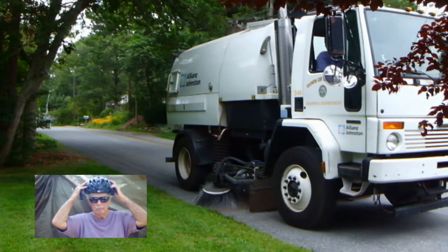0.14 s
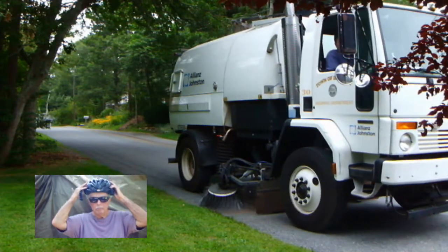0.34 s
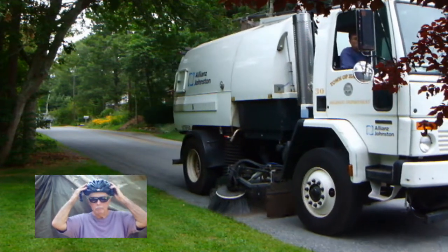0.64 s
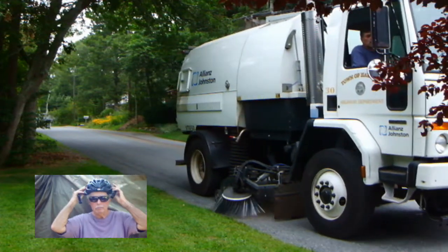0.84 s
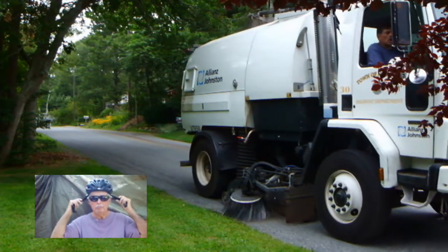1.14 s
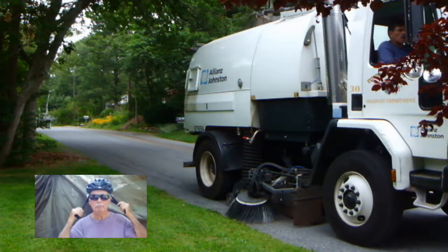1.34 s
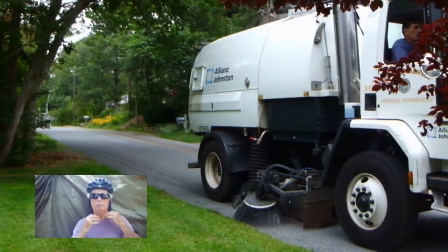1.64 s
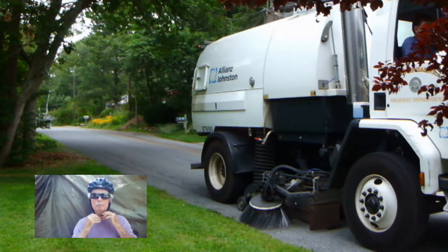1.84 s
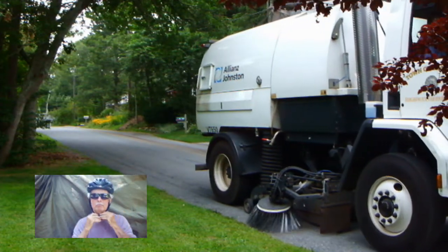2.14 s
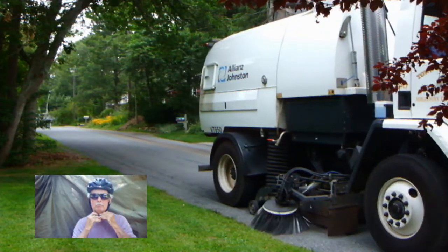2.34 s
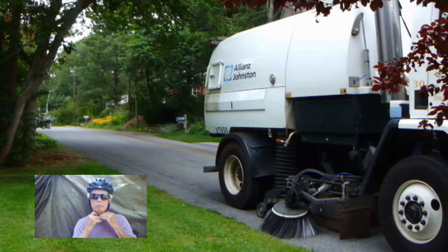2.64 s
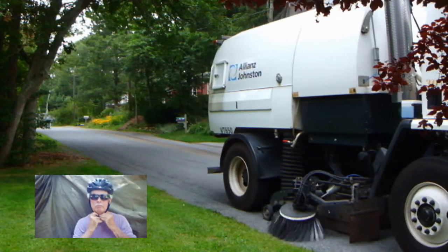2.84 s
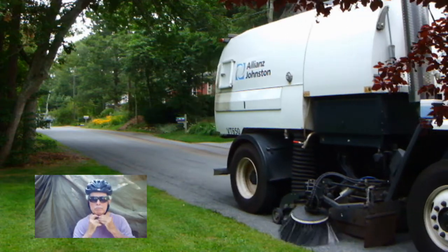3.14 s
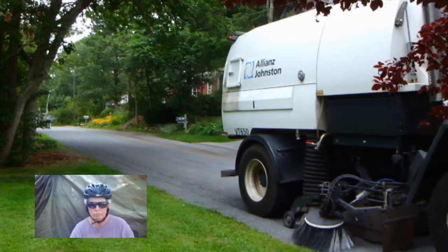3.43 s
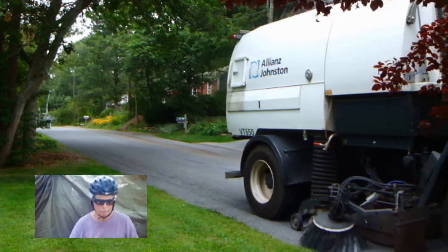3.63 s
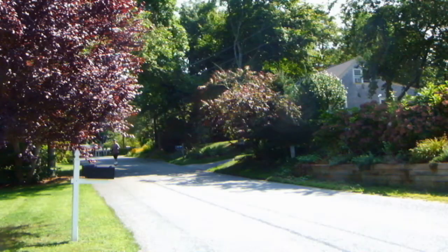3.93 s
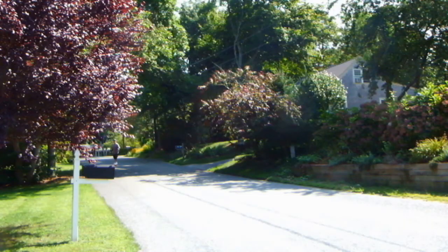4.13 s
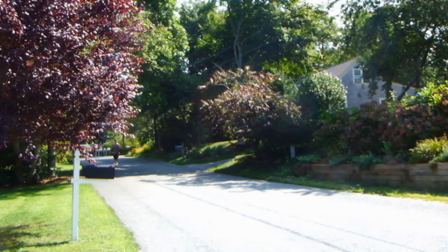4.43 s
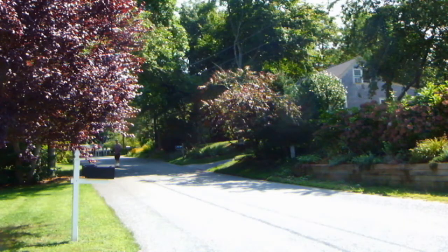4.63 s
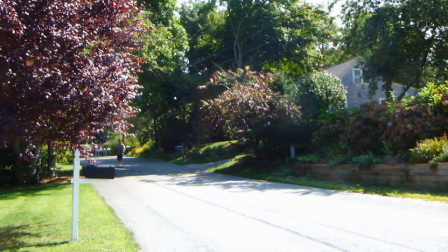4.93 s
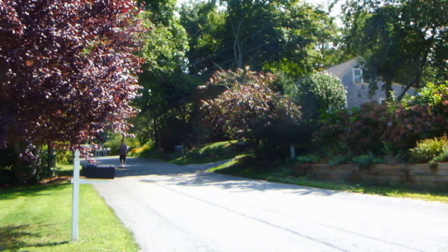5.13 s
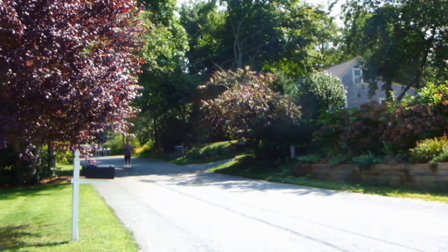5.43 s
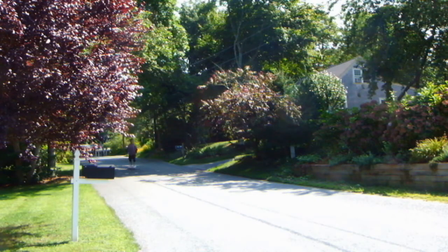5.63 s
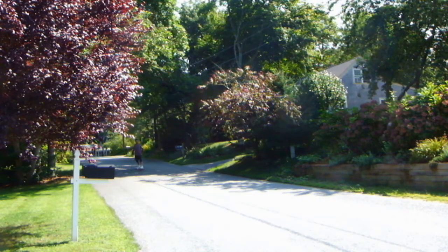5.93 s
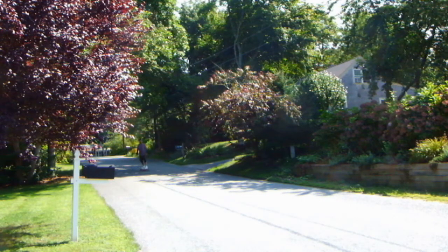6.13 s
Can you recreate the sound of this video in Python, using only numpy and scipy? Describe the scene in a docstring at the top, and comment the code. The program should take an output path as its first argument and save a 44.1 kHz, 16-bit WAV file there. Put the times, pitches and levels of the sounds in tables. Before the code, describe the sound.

Heard from the side of a residential road, a sweeping truck hums and roars steadily, its bristles hissing over the pavement. A few thin metal squeals come early, then one sharp, close buckle click. Suddenly the truck is gone, leaving soft outdoor air and a faint, low engine far away. A bird gives a short, high, buzzy call, and a bicycle rolls past with tyre hiss, freewheel ticking, small stone pops and a soft knock.

```python
"""Street sweeper, then a quiet road

A sweeper creeps along a tree-lined road: its diesel drones, the suction fan hums and roars, a wire
broom scrapes the asphalt and rubbing metal squeals. Close by, a plastic helmet buckle snaps shut.
A hard cut leads to the quiet road: a far engine throbs, a bird whistles thin and high, and a bicycle
coasts by, its freewheel ticking and grit popping under its tyres."""
import sys
import numpy as np
from scipy import signal
from scipy.fft import rfft, irfft
from scipy.io import wavfile
from scipy.ndimage import uniform_filter1d

SR = 44100
rng = np.random.default_rng(int(sys.argv[2]) if len(sys.argv) > 2 else 0)


def transcribe(u):
    """Save the signal u as a 16-bit wav file named by the first command-line argument.

    u: samples, shape (n,) or (channels, n), limited to [-1, 1]; the rate is SR.
    q: integer samples, one column per channel.
    """
    v = np.clip(np.atleast_2d(u).T, -1, 1)
    q = np.round(v * 32767).astype(np.int16)
    wavfile.write(sys.argv[1], SR, q)


N = 276491
T = np.arange(N) / SR

# the diesel speeds up a little: time_s, firing_hz
FIRING_RATE = [(0, 89.25), (.6, 90.44), (1.65, 92.46), (2.35, 96.16), (3.25, 96.3), (3.7, 97.64)]
# how alike left and right are near the truck: frequency_hz, correlation
TRUCK_LIKENESS = [(60, 0.97), (110, 0.98), (200, 0.97), (380, 0.96), (700, 0.93), (1290, 0.86),
                  (2380, 0.83), (4400, 0.35), (8120, 0.21), (15000, 0.17)]
# how alike left and right are on the quiet road: frequency_hz, correlation
ROAD_LIKENESS = [(60, 0.92), (130, 0.86), (290, 0.84), (640, 0.78), (1410, 0.69), (3100, 0.53),
                 (6820, 0.28), (15000, 0.5)]


def amp(db):
    """Decibels to gain."""
    return 10 ** (np.asarray(db) / 20)


def unit(x):
    """Scales to rms 1."""
    return x / np.sqrt(np.mean(x ** 2) + 1e-20)


def curve(rows):
    """A time table at every sample."""
    return np.interp(T, *np.transpose(rows))


def read(points, hz):
    """Reads a spectrum table on a log-frequency axis."""
    point_hz, value = np.transpose(points)
    return np.interp(np.log(hz + 1), np.log(point_hz + 1), value)


def colour(x, points):
    """Equalises a sound by rows of frequency_hz, gain_db."""
    return irfft(rfft(x) * amp(read(points, np.fft.rfftfreq(N, 1 / SR))), N)


def drift(hz):
    """Smooth random wander of rms 1, up to about hz changes a second."""
    lowpass = np.exp(-(np.fft.rfftfreq(N, 1 / SR) / hz) ** 2)
    return unit(irfft(rfft(rng.standard_normal(N)) * lowpass, N))


def noise(points, likeness, patchy_db):
    """Coloured stereo noise of rms 1, with short drifting patches in its spectrum."""
    hz = np.fft.rfftfreq(4096, 1 / SR)
    a, b, c, d, patches = rng.standard_normal((N // 1024 + 3, len(hz), 5)).T
    left, unrelated = a + 1j * b, c + 1j * d
    patches = unit(uniform_filter1d(uniform_filter1d(patches, size=50, axis=0), size=3, axis=1))
    same = np.clip(read(likeness, hz), -1, 1)[:, None]
    spectra = np.array([left, same * left + np.sqrt(1 - same ** 2) * unrelated])
    spectra *= amp(read(points, hz)[:, None] + patchy_db * patches)
    return unit(signal.istft(spectra, nperseg=4096, noverlap=3072)[1][:, :N])


def tone(hz, waver, waver_hz):
    """A sine of rms about 1 on a pitch curve, wavering in level and phase."""
    turns = np.cumsum(hz * np.ones(N)) / SR + rng.random()
    body = 1 + waver * (drift(waver_hz) + 1j * drift(waver_hz)) / np.sqrt(2)
    return np.sqrt(2 / (1 + waver ** 2)) * (body * np.exp(2j * np.pi * turns)).real


def note(start, length, attack_s, fade_db):
    """Envelope of one note: it swells, fades ever faster and stops softly."""
    age = np.clip(T - start, 0, length)
    release = np.minimum((length - age) / .015, 1)
    return np.minimum(age / attack_s, 1) * amp(fade_db * (age / length) ** 2) * release


def swell(peak_s, width_s):
    """Gain that rises to 1 and falls again, as for a source going by."""
    return 1 / np.hypot(1, (T - peak_s) / width_s)


def trees(x, t60):
    """Diffuse scatter from road and foliage, different for each ear."""
    t = np.arange(SR // 2) / SR
    tail = rng.standard_normal((2, len(t))) * amp(-60 * t / t60) * (1 - np.exp(-t / .005))
    return signal.fftconvolve(x[None], tail / np.linalg.norm(tail[0]), axes=1)[:, :N]


def add(mix, start_s, sound):
    """Mixes a sound in at a time."""
    part = mix[round(start_s * SR):][:len(sound)]
    part += sound[:len(part)]


def diesel():
    """The exhaust drones on the firing rate; unequal cylinders lope, most while the engine pulls."""
    # fader ride of the firing tone: time_s, level_db
    drone_level = [(0, -26), (.3, -29.5), (1.2, -31.5), (1.42, -34), (1.82, -26), (2.3, -36), (2.52, -23),
                   (2.76, -22), (3.12, -23.5), (3.38, -32.5), (3.49, -41), (3.7, -26.5)]
    # lope tones on the engine cycle, an eighth of the firing rate: multiple, relative_db
    lope_tones = [(3, -52), (5, -38.5), (6, -47), (7, -52), (9, -51.5), (10, -58), (11, -44.5), (17, -47.5),
                  (19, -52.5), (22, -67), (23, -54.5), (26, -52)]
    firing_hz = curve(FIRING_RATE)
    octave_gain = amp(-52 + 5.5 * T)  # grows as the truck draws level
    # the third harmonic swells as it passes through a resonance of the exhaust pipe
    pipe_hz, pipe_width_hz = 280.6, 7.7
    third_gain = amp(-39.5) / np.hypot(1, 2 * (3 * firing_hz - pipe_hz) / pipe_width_hz)
    gains = [amp(curve(drone_level)), octave_gain, third_gain]
    drone = sum(gain * tone(k * firing_hz, waver=.19, waver_hz=8.6) for k, gain in enumerate(gains, 1))
    lope = sum(amp(db) * tone(k * firing_hz / 8, waver=.35, waver_hz=3) for k, db in lope_tones)
    return drone + amp(2.5) * swell(peak_s=2.1, width_s=.95) * lope


def suction_fan():
    """The fan holds its speed; its blade tones fade as the truck turns side-on."""
    # harmonics of the blade rate: multiple, relative_db
    blade_tones = [(1, -48.5), (2, -51), (4, -59), (5, -64.5), (6, -65)]
    # throb of the fan's own engine: pitch_hz, level_db
    drive_tones = [(39.9, -42), (62.6, -44.5)]
    blade_hz = 213.5
    blades = sum(amp(db) * tone(k * blade_hz, waver=.4, waver_hz=4) for k, db in blade_tones)
    drive = sum(amp(db) * tone(hz, waver=.28, waver_hz=2) for hz, db in drive_tones)
    return amp(2 - 1.5 * T) * blades + drive


def roar():
    """Turbulent air puffs a little with every firing and grows as the suction inlet nears."""
    # bass-heavy rush of engine and suction: frequency_hz, relative_db
    roar_spectrum = [(20, -24), (35, -3.5), (65, 4), (110, 1), (160, -7.5), (225, -2), (300, -2),
                     (420, -10), (680, -9.5), (950, -16), (1170, -16), (1500, -23), (3000, -24.5),
                     (8000, -53.5)]
    puffs = 1 + .039 * np.cos(2 * np.pi * np.cumsum(curve(FIRING_RATE)) / SR)
    return amp(-35.5 + .66 * T) * unit(puffs * noise(roar_spectrum, TRUCK_LIKENESS, patchy_db=.5))


def broom():
    """Bristles scrape and fizz, slowly sinking; single wires and grit flick against the road."""
    # wire scraping asphalt: frequency_hz, relative_db
    scrape_spectrum = [(300, -21.5), (1400, -3), (2100, 0), (2800, -2.5), (3800, -4), (5500, -2.5),
                       (7000, -3.5), (9000, -7), (16000, -23)]
    # bright fizz of the bristle tips: frequency_hz, relative_db
    fizz_spectrum = [(3000, -27.5), (6500, -4), (8500, -4), (11500, -0.5), (14000, -3), (16000, -7.5)]
    flicks_per_s = 600
    flicks = (rng.random(N) < flicks_per_s / SR) * rng.standard_normal(N)
    flicks *= amp(2.3 * np.minimum(rng.exponential(1, N), 4))  # a few hit harder
    scrape = noise(scrape_spectrum, TRUCK_LIKENESS, patchy_db=1.15)
    scrape += amp(-17) * unit(colour(flicks, scrape_spectrum))
    fizz = noise(fizz_spectrum, TRUCK_LIKENESS, patchy_db=.8)
    pressure = amp(.3 * drift(hz=25))
    return pressure * (amp(-41 - .55 * T) * scrape + amp(-43 - 1.45 * T) * fizz)


def metal_squeals():
    """Rubbing metal sings briefly and scatters off the trees."""
    # thin squeals: start_s, length_s, pitch_hz, glide_hz_per_s, level_db
    squeals = [(1.17, .14, 6340, 0, -51), (1.265, .5, 6545, -60, -48), (1.02, .4, 10330, -400, -55.5),
               (1.36, .34, 10175, -120, -49)]
    sound = np.zeros(N)
    for start, length, hz, glide, db in squeals:
        envelope = amp(db) * note(start, length, attack_s=.03, fade_db=-7)
        sound += envelope * tone(hz + glide * (T - start), waver=.25, waver_hz=35)
    return sound + amp(-8.5) * trees(sound, t60=.2)


def buckle_snap():
    """Plastic prongs spring into their catches and ring briefly; the surroundings ring on."""
    # two prongs chatter home, with early echoes: start_s, relative_db, pitch_ratio
    clicks = [(2.901, 0, 1), (2.9018, -5, 1), (2.9021, -11, 1.72), (2.9023, -11, 2.1), (2.9026, -11, 1),
              (2.9032, -3, 1), (2.9062, -18, 1), (2.9076, -15, 1)]
    # resonances of the buckle: pitch_hz, relative_db, t60_s
    modes = [(2770, -18.5, 0.007), (5150, -11, 0.0058), (6110, 3.5, 0.0021), (7920, -17.5, 0.0072)]
    # bright tail from the surroundings: frequency_hz, relative_db
    tail_spectrum = [(1500, -29), (2700, -16), (4000, -13.5), (4650, -6), (5030, 1.5), (5400, -9.5),
                     (6400, -12), (7300, -16), (12000, -23), (16000, -44.5)]
    t, snap = np.arange(SR // 20) / SR, np.zeros(N)
    attack = 1 - np.exp(-t / .00013)
    for start, db, ratio in clicks:
        ring = sum(amp(level - 60 * t / t60) * np.sin(2 * np.pi * hz * ratio * t)
                   for hz, level, t60 in modes)
        add(snap, start, amp(db + 4.5) * ring * attack)
    age = np.maximum(T - clicks[0][0], 0)
    tail_envelope = (1 - np.exp(-age / .002)) * np.exp(-age / .038)
    return snap + amp(-29) * tail_envelope * noise(tail_spectrum, TRUCK_LIKENESS, patchy_db=1.5)


def road_ambience():
    """A bed of open air with a faint, steady whine."""
    # soft, dark air: frequency_hz, relative_db
    air_spectrum = [(15, -33), (32, -16), (60, -7.5), (90, -7), (150, -10), (330, -14.5), (430, -18.5),
                    (640, -18.5), (1040, -23), (2200, -29), (3600, -33), (6000, -37.5), (9100, -42),
                    (15500, -52)]
    # the whine: pitch_hz, level_db, waver_depth
    whine_tones = [(1056, -66.5, 0.82), (2120, -72.5, 0.13), (10900, -80.5, .1)]
    air = amp(-46) * noise(air_spectrum, ROAD_LIKENESS, patchy_db=.36)
    return air + sum(amp(db) * tone(hz, waver, waver_hz=15) for hz, db, waver in whine_tones)


def far_engine():
    """A distant engine throbs on one low, wavering tone."""
    # its two spells: start_s, length_s, level_db
    spells = [(4.081, 1.47, -49), (5.733, 0.53, -49)]
    envelope = sum(amp(db) * note(start, length, attack_s=.04, fade_db=-3.5)
                   for start, length, db in spells)
    return envelope * tone(hz=62, waver=.55, waver_hz=9)


def bird():
    """Thin buzzy whistles scoop up to pitch, swell and fade, blurred by the trees."""
    # the call: start_s, length_s, pitch_hz, glide_hz_per_s, level_db, buzz_width_hz
    whistles = [(4.13, .16, 9600, -600, -69, 500), (4.33, .035, 6650, 0, -58, 80),
                (4.355, .23, 8470, -1500, -62.5, 220), (4.58, .26, 8400, -200, -60.5, 220)]
    scoop_hz, scoop_s = 560, .035
    song = np.zeros(N)
    for start, length, hz, glide, db, buzz_hz in whistles:
        age = np.clip(T - start, 0, length)
        pitch = hz + glide * age - scoop_hz * np.exp(-age / scoop_s)
        envelope = amp(db) * note(start, length, attack_s=.24 * length, fade_db=-13)
        song += envelope * tone(pitch, waver=3.1, waver_hz=buzz_hz)
    return song + amp(-2) * trees(song, t60=.25)


def tyres():
    """Rolling rubber gives a fluttering hiss over a low rumble."""
    # tread hiss: frequency_hz, relative_db
    hiss_spectrum = [(1000, -9), (2200, 8.5), (3000, 4), (4100, -5), (5500, 4.5), (7200, -1.5), (9500, -19),
                     (15000, -38.5)]
    # rolling rumble: frequency_hz, relative_db
    rumble_spectrum = [(70, -28), (140, 1.5), (220, 0), (330, -2.5), (450, -7.5), (700, -9.5),
                       (1500, -42.5), (6000, -70)]
    hiss = amp(-1.5 + 2 * drift(hz=70)) * noise(hiss_spectrum, ROAD_LIKENESS, patchy_db=1)
    rumble = amp(6.5) * noise(rumble_spectrum, ROAD_LIKENESS, patchy_db=1)
    return hiss + rumble


def freewheel():
    """Pawls tick unevenly over the ratchet teeth."""
    # narrow metallic ring of a tick: frequency_hz, relative_db
    tick_spectrum = [(2500, -36), (4400, -19), (5000, 0), (5400, 2), (5800, -5), (7000, -16), (12000, -48)]
    teeth_per_s = 124 * (1 + .14 * drift(hz=60))
    teeth_passed = np.floor(np.cumsum(teeth_per_s) / SR)
    pawls = np.diff(teeth_passed, prepend=0) * amp(3.8 * rng.standard_normal(N))
    ticking = unit(colour(pawls, tick_spectrum))
    return unit(ticking + trees(ticking, t60=.019))


def grit():
    """Stones pop under the tyres: a short knock, then a puff of crackle."""
    # one pop per stone: start_s, relative_db, pitch_hz
    stones = [(5.244, -44, 3050), (5.2971, -36, 3200), (5.635, -36.5, 2450), (5.6673, -33.5, 2240),
              (5.683, -38.5, 5320), (5.7446, -38.5, 2290), (5.778, -43, 2340), (5.8292, -43, 5290),
              (5.8874, -37, 2130), (5.9747, -38.5, 2420), (5.9922, -40, 5220)]
    t, pops = np.arange(SR // 20) / SR, np.zeros(N)
    for start, db, hz in stones:
        knock = np.sin(2 * np.pi * hz * t) * np.exp(-t / .0006)
        crackle = .37 * rng.standard_normal(len(t)) * np.exp(-t / .005)
        add(pops, start, amp(db + 4.5) * (knock + crackle))
    pops = colour(pops, [(700, -18), (1500, -7), (2300, .5), (4200, -4), (6500, -6), (11000, -35)])
    return pops + amp(-5) * trees(pops, t60=.11)


def bump():
    """The bicycle knocks softly over a bump."""
    # one damped ring: start_s, pitch_hz, peak_db, t60_s
    knock = (5.985, 690, -42, .08)
    start, hz, db, t60 = knock
    age = np.maximum(T - start, 0)
    return amp(db - 60 * age / t60) * np.sin(2 * np.pi * hz * age)


def bicycle():
    """A bicycle swells and fades as it coasts by; its freewheel carries less far than its tyres."""
    closest_s = 5.81
    rolling = amp(-56) * swell(closest_s, width_s=.72) ** 2 * tyres()
    ticking = amp(-59.5) * swell(closest_s, width_s=.38) ** 2 * freewheel()
    return rolling + ticking + grit() + bump()


def scene():
    """The sweeper, then a hard cut to the quiet road."""
    cut_s = 3.718
    sweeper = diesel() + suction_fan() + roar() + broom() + metal_squeals() + buckle_snap()
    quiet_road = road_ambience() + far_engine() + bird() + bicycle()
    return np.where(T < cut_s, sweeper, quiet_road)


def record(dry):
    """Slightly unequal microphones, clipping at full scale, and a steep treble cut."""
    # the image leans a little to the right: frequency_hz, left_minus_right_db
    balance = [(60, -1.5), (110, -1.9), (200, -0.87), (380, -0.7), (700, -0.5), (1290, -0.5), (2380, -1.2),
               (4400, -0.076), (8120, -0.61), (15000, -0.5)]
    # phase between the microphones: frequency_hz, left_lead_rad
    phase_lead = [(50, -0.13), (200, -0.32), (1000, -0.016), (4000, -.1), (12000, -0.22)]
    hz = np.fft.rfftfreq(N, 1 / SR)
    left_response = amp(read(balance, hz) / 2) * np.exp(.5j * read(phase_lead, hz))
    stereo = irfft(rfft(dry) * np.array([left_response, 1 / left_response]), N)
    lowpass = signal.firwin(511, cutoff=15800, window=("kaiser", 9), fs=SR)
    return signal.oaconvolve(np.clip(stereo, -1, 1), lowpass[None], "same")


dry = scene()
out = record(dry)
transcribe(out)
```